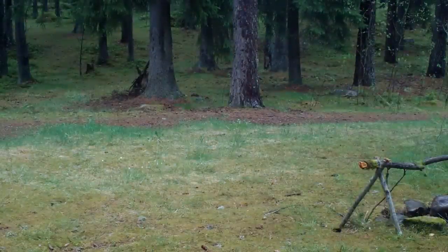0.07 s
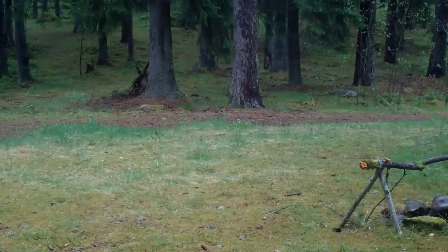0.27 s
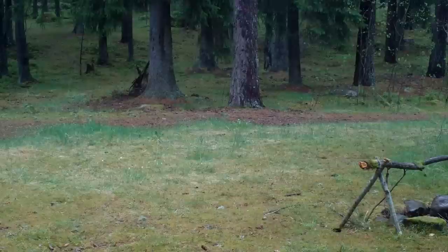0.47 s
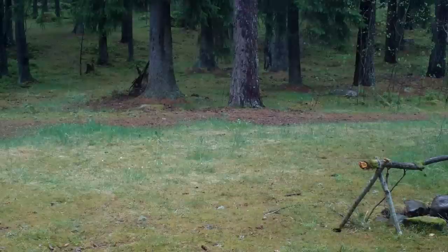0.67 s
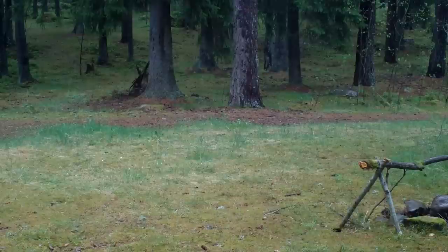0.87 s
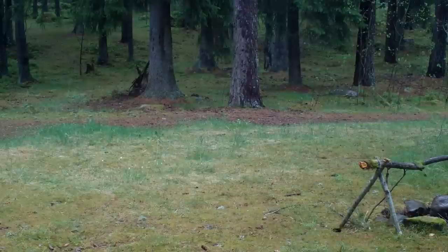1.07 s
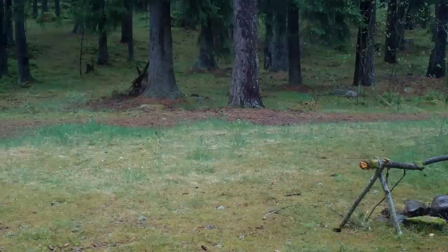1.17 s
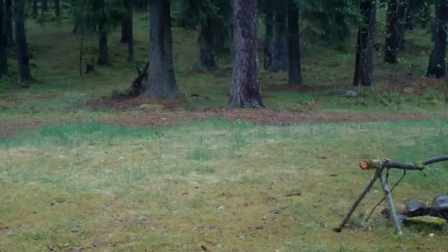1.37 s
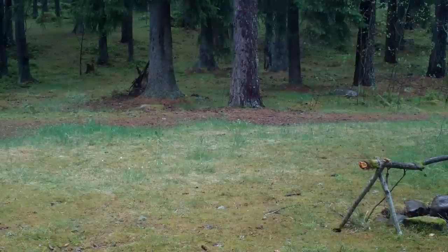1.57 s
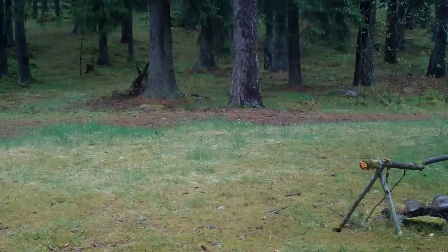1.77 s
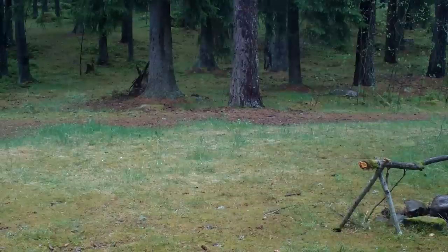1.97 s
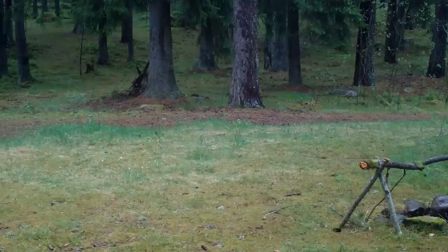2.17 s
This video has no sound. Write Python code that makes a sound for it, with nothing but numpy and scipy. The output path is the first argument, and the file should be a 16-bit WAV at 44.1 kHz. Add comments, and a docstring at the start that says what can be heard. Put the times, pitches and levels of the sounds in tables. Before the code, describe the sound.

Arrow shafts slide into a leather quiver with a quick rattling scrape, then sparse wooden ticks

```python
"""Arrow shafts slide into a leather quiver close to a small camera microphone in a forest clearing.
Light wind and tree hush lie behind as flickering noise, with a faint treble crackle; a low rub dies away.
From 0.2 to 0.65 s shafts slide in: stick-slip grains scrape, snaps and chatter ring the wood, and
the pouch thuds in low leather modes. Sparse ticks follow, with one strong clean snap near 1.55 s.
The microphone port rings near 7 kHz on everything."""
import sys
import numpy as np
from scipy import signal
from scipy.fft import rfft, irfft
from scipy.io import wavfile
from scipy.ndimage import uniform_filter1d

SR = 44100
rng = np.random.default_rng(int(sys.argv[2]) if len(sys.argv) > 2 else 0)


def output_pcm(signal):
    """Save a mono or channel-first signal as 16-bit PCM at the path in sys.argv[1].

    Samples are clipped to [-1, 1] before scaling.
    """
    pcm = np.clip(np.atleast_2d(signal).T, -1, 1) * 32767
    wavfile.write(sys.argv[1], SR, np.round(pcm).astype(np.int16))


def undo_db(level):
    """Turn decibels back into plain size, where 20 dB means ten times bigger."""
    steps = np.asarray(level, float) / 20
    return 10 ** steps


N = 97020  # 2.2 s


def band(x, hz, width_hz):
    """Two-pole resonance, gain 1 at the centre."""
    return signal.lfilter(*signal.iirpeak(hz, hz / width_hz, fs=SR), x)


def low(x, hz):
    """Gentle low-pass."""
    return signal.lfilter(*signal.butter(1, hz, fs=SR), x)


def steep_high(x):
    """Keeps the bright part above 5200 Hz."""
    return signal.sosfilt(signal.butter(2, 5200, "high", fs=SR, output="sos"), x)


def fade(t, t60):
    """Exponential decay gain, 60 dB down after t60 seconds."""
    return undo_db(-60 * t / t60)


def unit(x):
    """Scales to rms 1."""
    return x / np.sqrt(np.mean(x ** 2))


def curve(rows):
    """Gain along (seconds, dB) points."""
    rows = np.array(rows)
    return undo_db(np.interp(np.arange(N) / SR, rows[:, 0], rows[:, 1]))


def walk(rate):
    """Random levels held 1 / rate seconds, slewed twice and scaled up again."""
    hold = int(SR / rate)
    held = np.repeat(rng.standard_normal(N // hold + 1), hold)
    return 1.52 * uniform_filter1d(uniform_filter1d(held, hold), hold)[:N]


def grains(per_s, spread_db, t60):
    """Dense tiny catches of very uneven size, each a short decaying puff of bright noise."""
    hits = (rng.random(N) < per_s / SR) * undo_db(spread_db * rng.exponential(size=N))
    puffs = signal.lfilter([1], [1, -fade(1 / SR, t60)], hits)
    return unit(steep_high(puffs * rng.standard_normal(N)))


def ring(x, hz, t60):
    """One decaying mode struck by x."""
    pole = np.exp(2j * np.pi * hz / SR - np.log(1000) / (t60 * SR))
    return signal.lfilter([1], [1, -pole], x + 0j).imag


def struck(modes, gains_db, detune, push):
    """An object's modes, detuned and mixed anew for one blow; neighbours swing in opposite senses."""
    total = 0
    for k, ((hz, db, t60), gain_db, shift) in enumerate(zip(modes, gains_db, detune)):
        total = total + (-1) ** k * undo_db(db + gain_db) * ring(push, hz * (1 + shift), t60)
    return total


def forest():
    """Wind and tree hush: noise bands half an octave apart that swell together and flicker alone."""
    # Hush ahead of the microphone port. Each row: frequency in Hz, relative spectral level in dB per Hz.
    hush_spectrum = [(15, -6), (28, 2), (60, -1.5), (130, -14), (300, -19.5), (800, -21.5), (1300, -27.5),
                     (2500, -33.5), (4500, -39), (7300, -72), (11000, -38), (16000, -36.5)]
    level_db, gust_db, flicker_db = -33, -0.45, 1.54
    out, gust, shape = 0, walk(1.5), np.array(hush_spectrum)
    f = np.fft.rfftfreq(N, 1 / SR) + 1  # 1 Hz up, to keep the logarithm finite
    tilt_db = np.interp(np.log(f), np.log(shape[:, 0]), shape[:, 1])
    spectrum = rfft(rng.standard_normal(N)) * undo_db(tilt_db)
    for hz in 15 * 2 ** np.arange(0, 10.6, .5):
        # neighbouring shares overlap and add up to 1
        share = np.cos(np.pi * np.clip(np.log2(f / hz), -.5, .5)) ** 2
        out = out + irfft(spectrum * share, N) * undo_db(gust_db * gust + flicker_db * walk(12.04))
    return undo_db(level_db) * unit(out)


def rustle():
    """Faint fine crackle of cloth and leaves, built of uneven tiny catches."""
    # Treble level of the rustle. Each row: time in seconds, level in dB.
    rustle_levels = [(0, -48), (.05, -51), (.13, -74), (.17, -60), (.66, -54), (.82, -51), (.93, -65),
                     (1.0, -44), (1.2, -57), (1.35, -61), (1.45, -73), (1.53, -45.5), (1.68, -44.5),
                     (1.75, -69), (2.05, -56.5), (2.2, -62)]
    return curve(rustle_levels) * grains(1800, 4.7, 0.014)


def rub():
    """Dull leather friction: noise through two broad low resonances, unsteady in level."""
    # Low rub of the pouch dying away, then under the sliding. Each row: time in seconds, level in dB.
    rub_levels = [(0, -35.5), (.1, -39.5), (.2, -46.5), (.27, -45), (.28, -29), (.36, -35), (.42, -42.5),
                  (.55, -44.5), (.62, -65), (.7, -84)]
    dull = unit(band(band(rng.standard_normal(N), 344, 450), 340, 450))
    return curve(rub_levels) * dull * undo_db(2 * walk(39.4))


def slide():
    """Stick-slip grains under the sliding level, with a duller leather rasp."""
    # Shafts along the leather. Each row: time in seconds, level in dB shared by scrape and rasp.
    slide_levels = [(.17, -53.5), (.195, -52), (.205, -35.5), (.212, -26), (.225, -42.5), (.245, -39),
                    (.27, -45.5), (.2745, -35), (.29, -27), (.298, -19), (.315, -25.5), (.345, -18.5),
                    (.355, -17), (.368, -25.5), (.378, -29.5), (.39, -21.5), (.43, -23.5), (.444, -28.5),
                    (.452, -21), (.472, -36.5), (.482, -29.5), (.53, -31.5), (.545, -43), (.575, -42.5),
                    (.6, -54), (.62, -46), (.64, -59.5), (.66, -56)]
    scrape_db, rasp_db = 8.5, -4.5
    rasp = unit(band(rng.standard_normal(N), 2400, 2600)) * undo_db(2 * walk(148.7))
    scrape = grains(5000, 2.5, .006)
    return curve(slide_levels) * (undo_db(scrape_db) * scrape + undo_db(rasp_db) * rasp)


def ticks():
    """A broad snap, then a duller chatter and faint tail; the same contact rings the wooden shaft."""
    # Shaft contacts. Each row: start in seconds, level in dB, woody part against the bright part in dB,
    # chatter t60 in seconds, dB taken off the chatter (and its tail) of a clean snap.
    contacts = [(0.018, -34.0, -15, 0.012, -5), (0.1981, -32.0, -22.0, 0.01, -3),
                (0.2063, -11, -28.5, 0.012, -5), (0.2174, -20.5, -19, 0.0081, -3),
                (0.2743, -12.5, -22, 0.013, -1), (0.2809, -10.0, -23, 0.017, -3),
                (0.2919, -10, -23, 0.021, -7), (0.295, -7.0, -24, 0.014, -3.5),
                (0.3004, -10, -20, 0.016, -6), (0.3226, -15.5, -18, 0.014, -6),
                (0.322, -10.5, -17.5, 0.0098, -0.5), (0.3377, -13.5, -18.5, 0.018, -2.5),
                (0.35, -9, -30, 0.019, -4.5), (0.3596, -12.5, -21.5, 0.023, -4.5),
                (0.3825, -16.5, -18, 0.014, -4), (0.385, -11, -28, 0.012, -1),
                (0.3957, -13, -26, 0.02, -1.5), (0.4013, -17, -28, 0.015, -4), (0.4144, -14, -33, 0.01, -8),
                (0.4192, -15, -26, 0.012, -4), (0.426, -16.5, -18.0, 0.0098, -1.5),
                (0.4476, -6, -27.5, 0.014, -1.5), (0.451, -11, -22, 0.021, -1.5),
                (0.4548, -18, -25, 0.006, -4), (0.4611, -22, -25, 0.012, -1),
                (0.4776, -24, -15, 0.0099, -4), (0.5, -18.5, -24, 0.013, -5),
                (0.5096, -20.0, -18, 0.012, -2), (0.5275, -22.5, -17.5, 0.014, -5.5),
                (0.5331, -13, -26, 0.014, -2), (0.547, -32, -15, 0.014, -3), (0.5543, -28, -21, 0.013, -5),
                (0.5689, -30, -21, 0.0096, -3), (0.6119, -27.5, -18, 0.0095, -4.5),
                (0.619, -25.5, -16, 0.014, -3), (0.816, -37.5, -16, 0.0092, -4),
                (0.9503, -18, -18, 0.036, -3), (1.0636, -31.5, -6, 0.02, -3),
                (1.0772, -36.5, -16, 0.017, -4), (1.195, -43.5, -0.5, 0.0073, -3),
                (1.2664, -22, -15, 0.011, -3), (1.2691, -19, -24.5, 0.0088, -3.5),
                (1.274, -36, -18, 0.04, -5), (1.2884, -23, -20.5, 0.012, -3.5),
                (1.3013, -20.5, -28, 0.029, -6), (1.3017, -21, -22, 0.016, 0),
                (1.3073, -16, -22.0, 0.012, 0.5), (1.32, -23.5, -20.5, 0.011, -4.5),
                (1.3314, -30, -11, 0.017, -2), (1.3403, -35, -15, 0.016, -2), (1.366, -34, -22, 0.008, -4),
                (1.371, -25.5, -24.0, 0.0087, -2), (1.3964, -24.5, -18.5, 0.0066, -3.5),
                (1.4495, -36, -14.5, 0.011, -3), (1.5229, -42, -20, 0.012, -4),
                (1.5424, -28, -9.5, 0.019, -2), (1.5481, -24.5, -10, 0.017, 0),
                (1.555, 2.5, -25.5, 0.0082, 16.5), (1.5631, -23.5, -14, 0.012, -4),
                (1.5703, -30.5, -12, 0.0094, -1), (1.577, -32, -20, 0.0065, -1),
                (1.5974, -17, -22.0, 0.0091, 0.5), (1.5995, -20, -20.5, 0.015, -7.5),
                (1.6125, -33.0, -22, 0.012, -3), (1.6263, -20, -18, 0.0081, -2),
                (1.6378, -31, -14, 0.014, -3.5), (1.6395, -33, -17, 0.006, 2),
                (1.6424, -22.5, -18, 0.0075, -0.5), (1.656, -29, -27, 0.016, -1.5),
                (1.6784, -40, -23, 0.012, -5), (1.8038, -30.5, -16.5, 0.004, 0.5),
                (1.8441, -33, -27, 0.0089, 0), (2.0721, -38.0, -17, 0.0075, -2)]
    # Wooden shaft modes. Each row: frequency in Hz, level in dB, t60 in seconds.
    shaft_modes = [(757, -1.5, .01), (1056, -3, .009), (1456, -3.5, 0.01), (1826, -1, 0.0067),
                   (2260, -0.5, 0.0072), (3050, -3.5, 0.0032), (3580, -9, 0.002), (4750, -20, 0.0017)]
    snap_db, chatter_db, wood_gain_db, dull_hz = 18, 0.5, -8, 13300
    tail_db, tail_t60_s = -11, 0.058
    scatter_db, detune_share = 3, .08  # from contact to contact
    out, t = np.zeros(N + 4000), np.arange(4000) / SR
    chance = rng.standard_normal((len(contacts), len(t) + 2 * len(shaft_modes)))
    for (start_s, db, wood_db, t60, clean_db), draws in zip(contacts, chance):
        decay = fade(t, t60) + undo_db(tail_db) * fade(t, tail_t60_s)
        hit = low(draws[:len(t)], dull_hz) * decay * undo_db(chatter_db - clean_db)
        hit[0] = undo_db(snap_db)  # the snap is a single sample
        mix, detune = draws[len(t):].reshape(2, -1)
        wood = struck(shaft_modes, scatter_db * mix, detune_share * detune, hit)
        tick = steep_high(hit) + undo_db(wood_gain_db + wood_db) * wood
        out[int(start_s * SR):][:len(t)] += undo_db(db) * tick
    return out[:N]


def pouch():
    """Each thud rings the leather's low modes, most those near the pitch of the place it lands on."""
    # Thuds of the pouch. Each row: start in seconds, level in dB, pitch of the struck place in Hz.
    thuds = [(0.276, -23.5, 347), (0.281, -23, 158), (0.29, -24.5, 606), (0.299, -30, 646),
             (0.312, -24.5, 383), (0.321, -21.5, 397), (0.334, -21, 135), (0.344, -36, 102),
             (0.354, -35, 205), (0.381, -31, 230), (0.39, -24.5, 323), (0.399, -41, 223), (0.427, -33, 280),
             (0.449, -31, 147), (0.479, -32, 610), (0.525, -31.5, 304), (0.534, -37, 247),
             (0.558, -47, 237), (0.611, -39.5, 665), (0.621, -40, 102)]
    # Leather modes. Each row: frequency in Hz, level in dB, t60 in seconds.
    leather_modes = [(94, -15, 0.05), (126, 3, .06), (154, 1.5, 0.074), (245, -1.5, 0.057),
                     (304, -5, 0.064), (371, 0.5, 0.067), (462, -10, 0.063), (624, -2, 0.074),
                     (790, -4, 0.051), (1010, -10, 0.022)]
    thud_gain_db, scatter_db, detune_share = 9, 3.5, 0.068
    seat_oct = 0.98  # modes this many octaves from the struck pitch lose 6 dB
    out, push = np.zeros(N + 6000), np.eye(1, 6000)[0]  # the push is one impulse
    chance = rng.standard_normal((len(thuds), 2, len(leather_modes)))
    for (start_s, db, hz), (mix, detune) in zip(thuds, chance):
        away = np.log2(np.array(leather_modes)[:, 0] / hz) / seat_oct
        gains_db = scatter_db * mix - 6 * away ** 2
        thud = struck(leather_modes, gains_db, detune_share * detune, push)
        out[int(start_s * SR):][:len(push)] += undo_db(db + thud_gain_db) * thud
    return out[:N]


def scene():
    """All sources at the microphone, in one channel."""
    return (ticks() + slide() + pouch() + forest() + rustle() + rub())[None]


def low_pass(x):
    """Removes everything above the highest recorded frequency."""
    return signal.sosfilt(signal.butter(12, 17150, fs=SR, output="sos"), x)


def record(dry):
    """The microphone port is a resonant low-pass, gain 1 at its peak; the top is cut in two steps."""
    port_hz, port_q = 7350, 7
    top_hz, over_top_db, end_hz = 15780, -10, 16550
    f = np.fft.rfftfreq(N, 1 / SR)
    port = 1 / port_q / (1 - (f / port_hz) ** 2 + 1j * f / port_hz / port_q)
    top = np.where(f < top_hz, 1, undo_db(over_top_db)) * (f < end_hz)
    mix = irfft(rfft(dry) * port * top, N)
    return low_pass(mix)


dry = scene()
out = record(dry)
output_pcm(out)
```